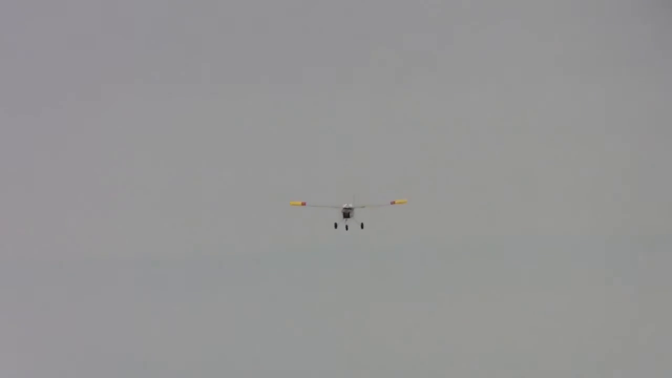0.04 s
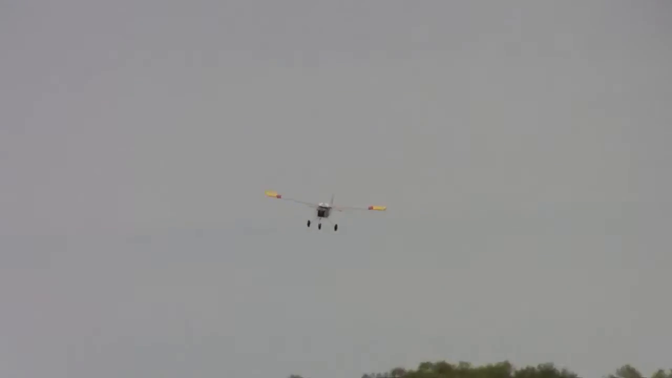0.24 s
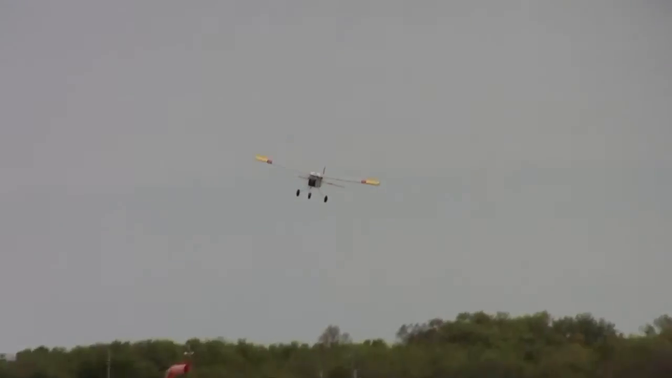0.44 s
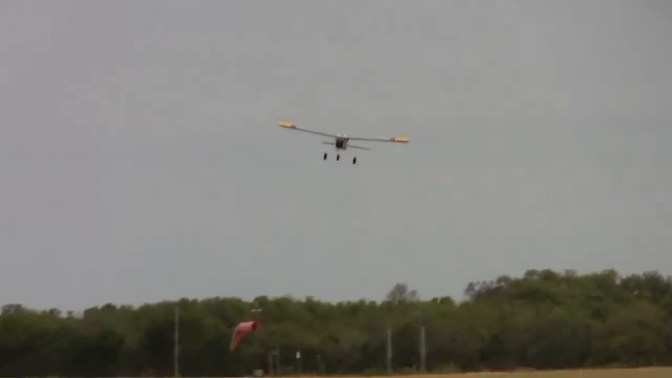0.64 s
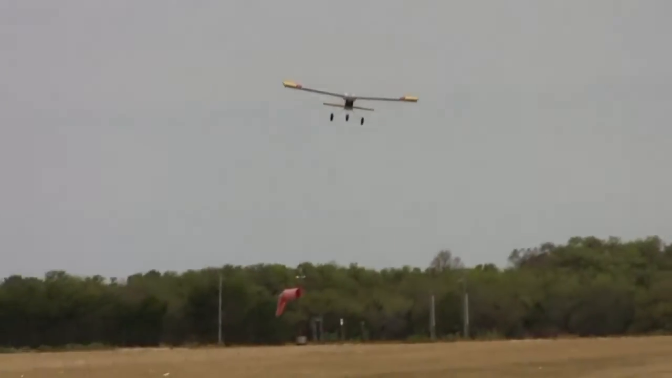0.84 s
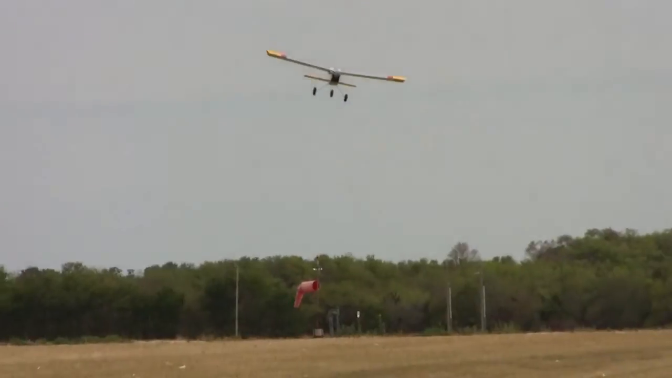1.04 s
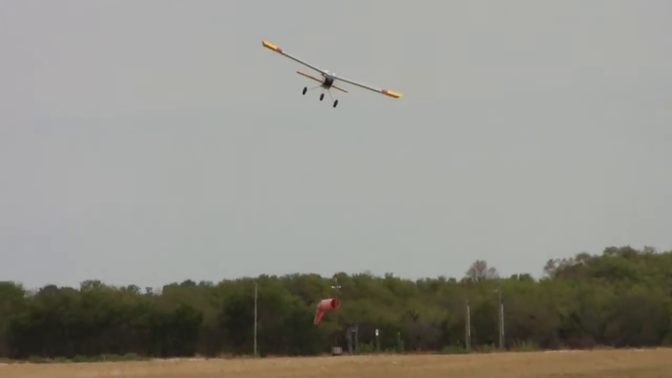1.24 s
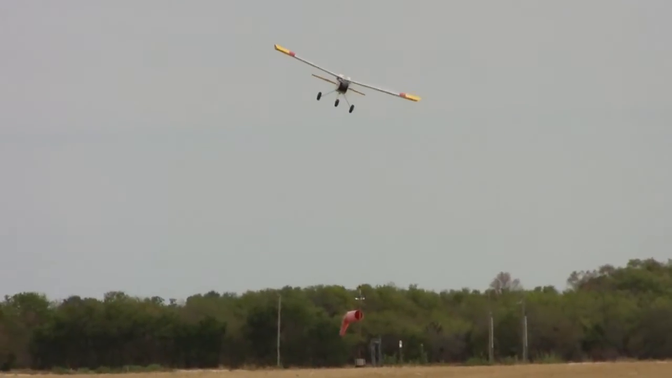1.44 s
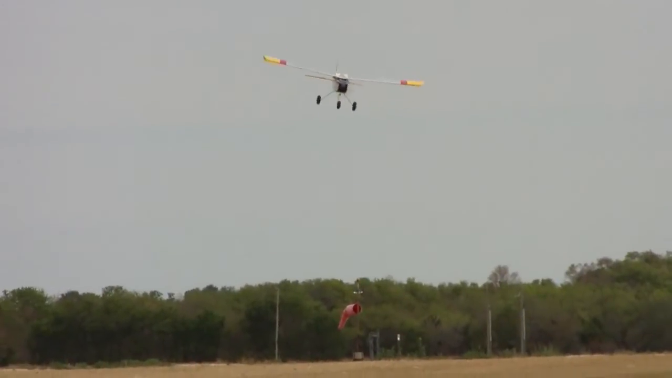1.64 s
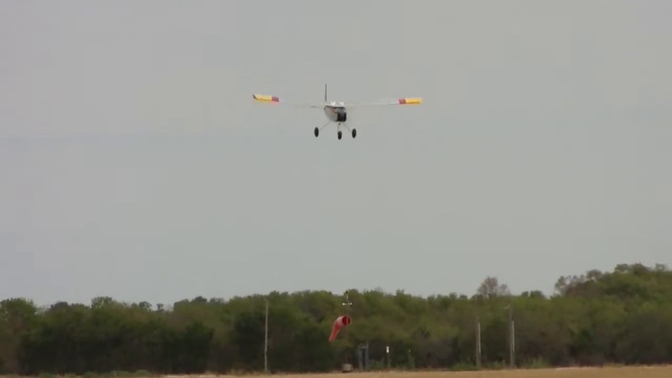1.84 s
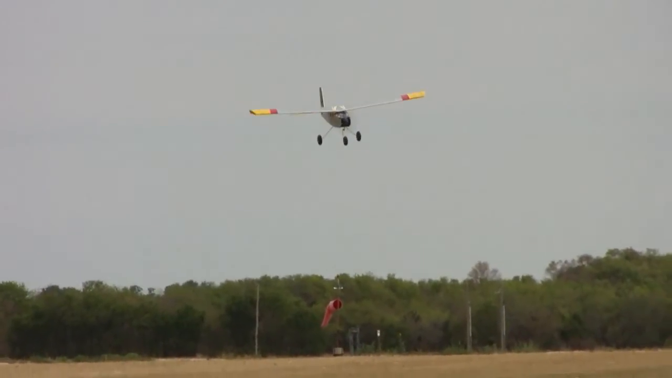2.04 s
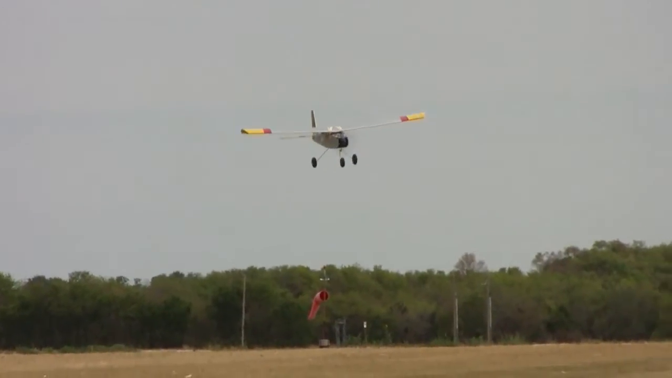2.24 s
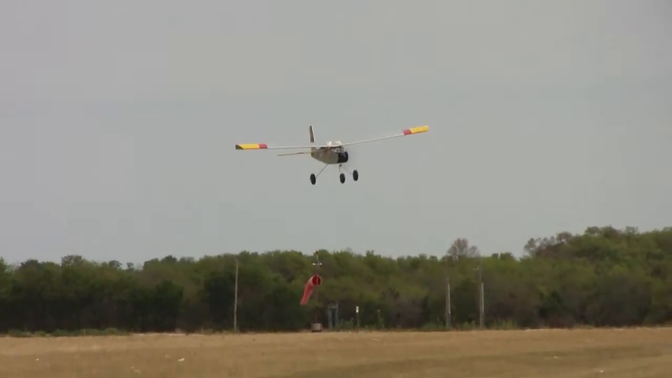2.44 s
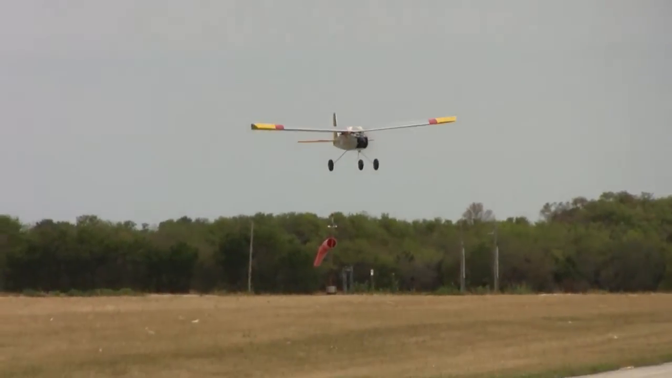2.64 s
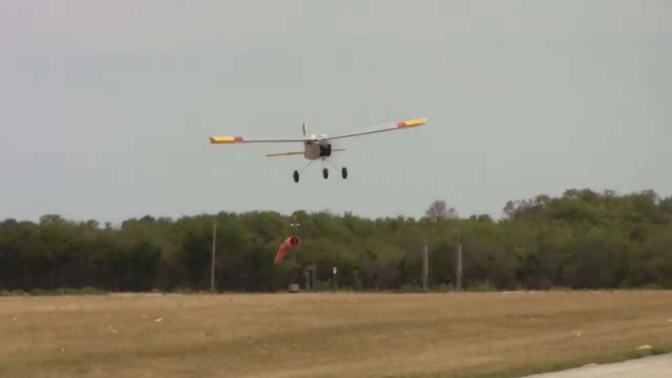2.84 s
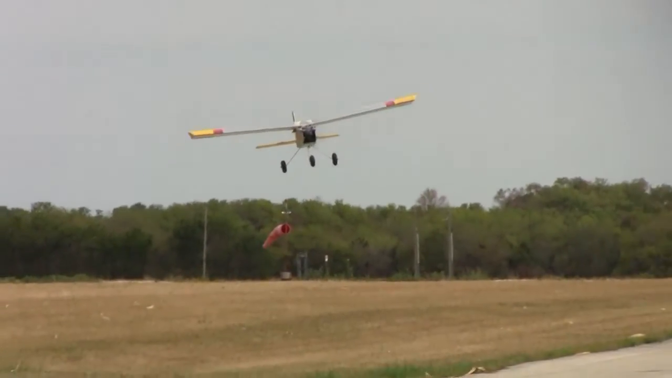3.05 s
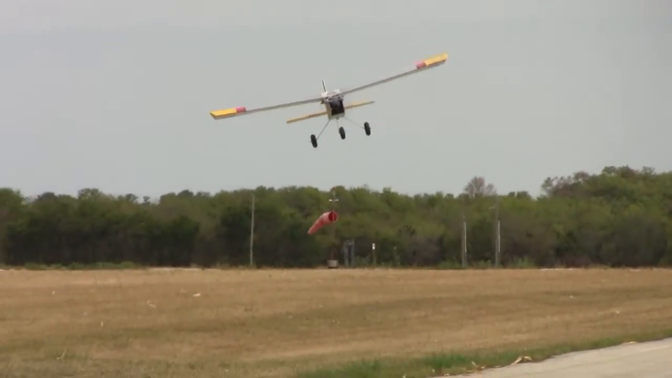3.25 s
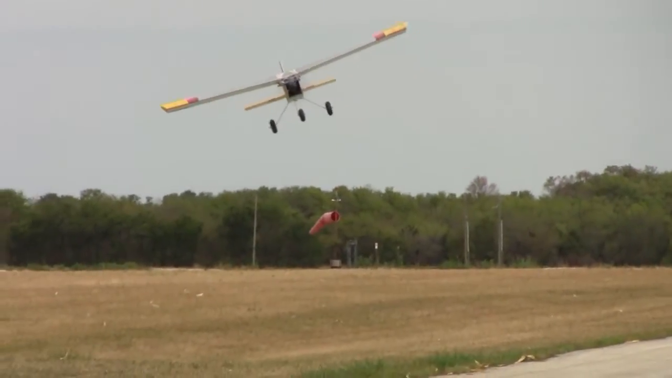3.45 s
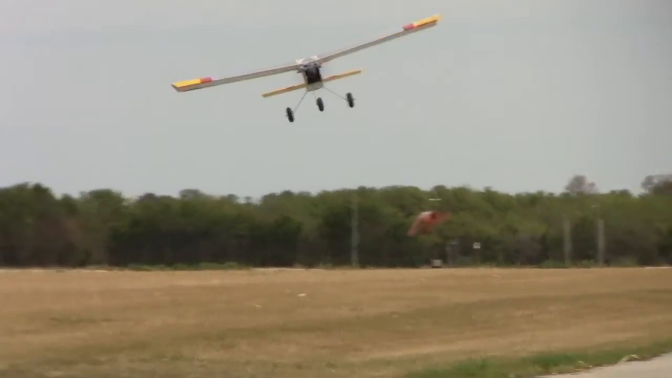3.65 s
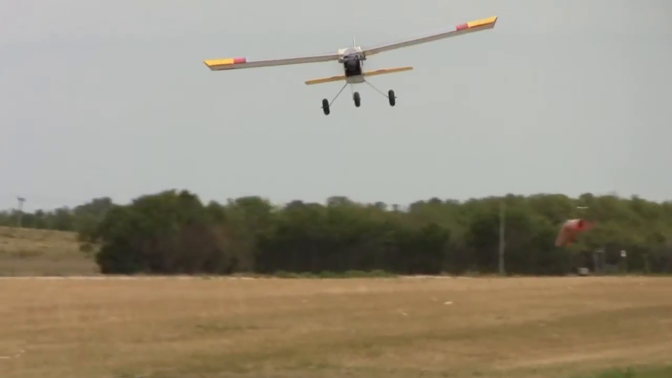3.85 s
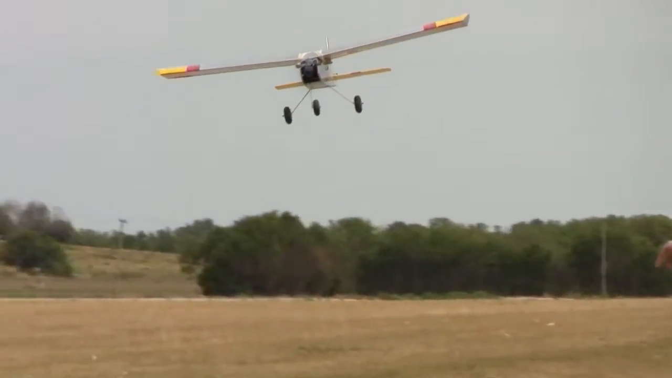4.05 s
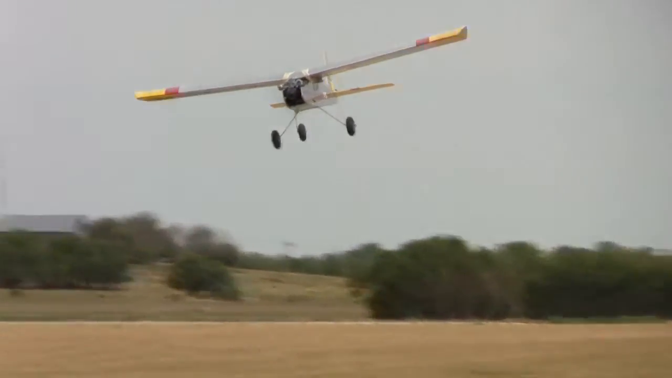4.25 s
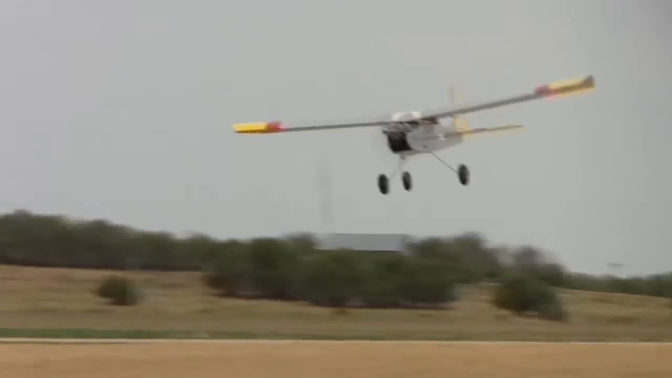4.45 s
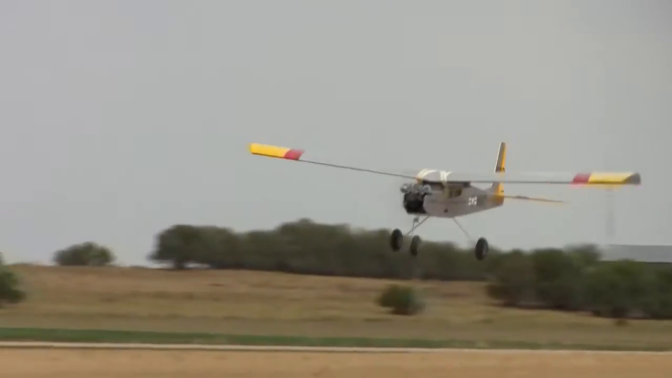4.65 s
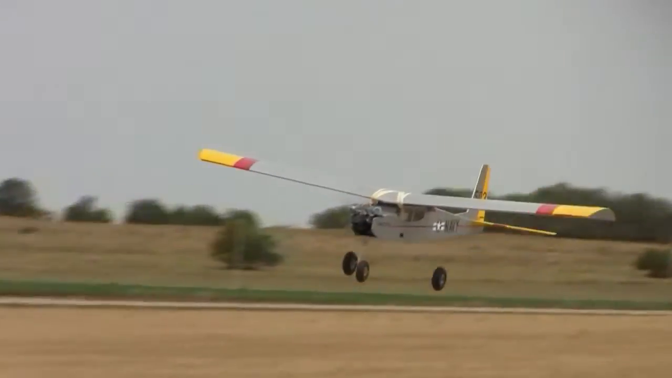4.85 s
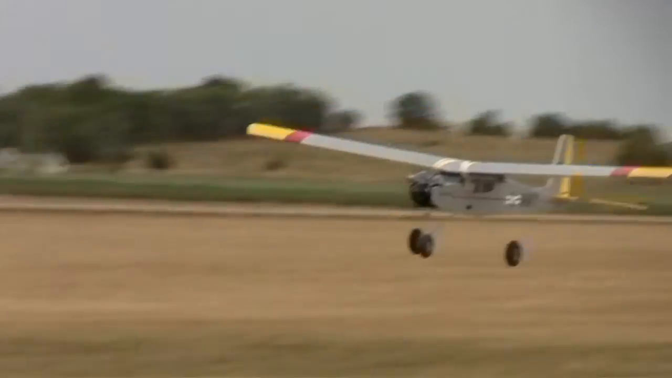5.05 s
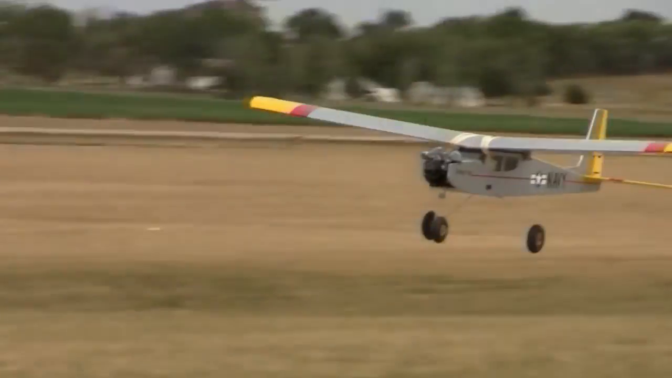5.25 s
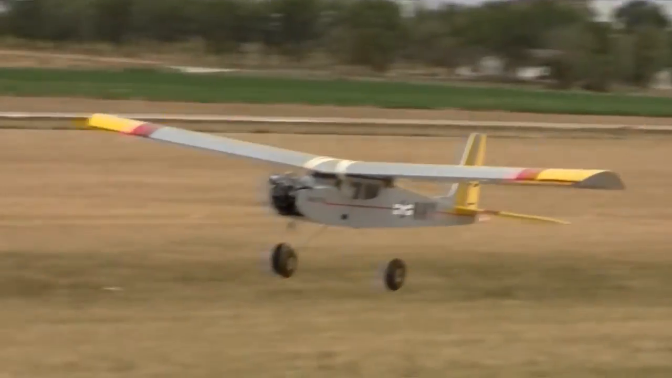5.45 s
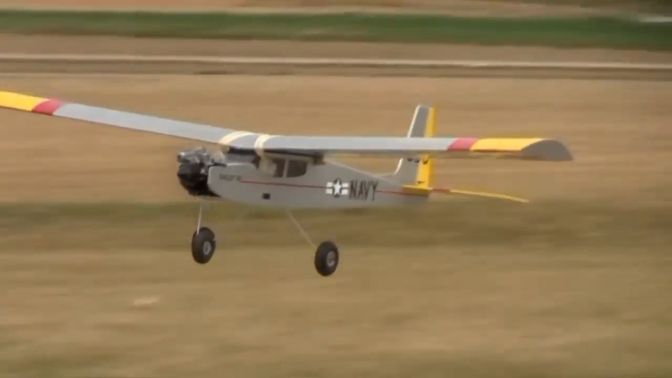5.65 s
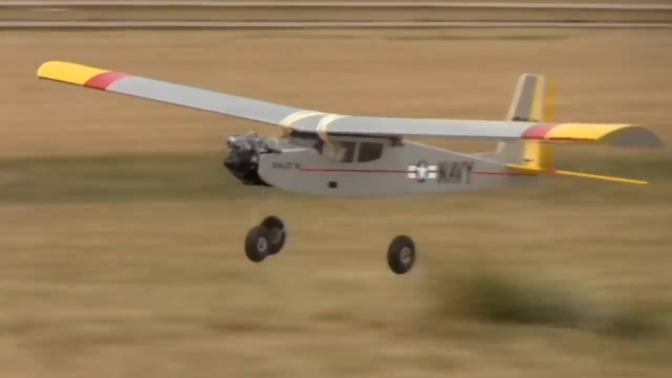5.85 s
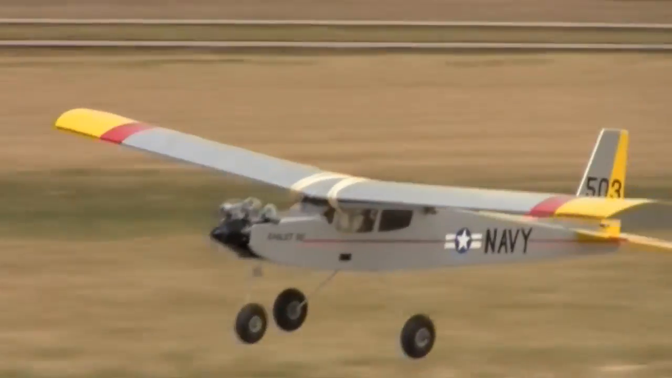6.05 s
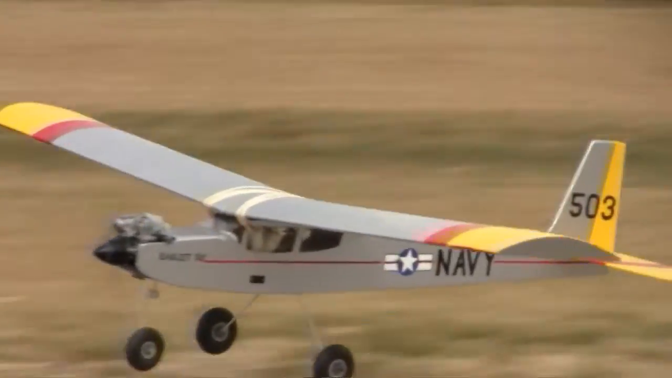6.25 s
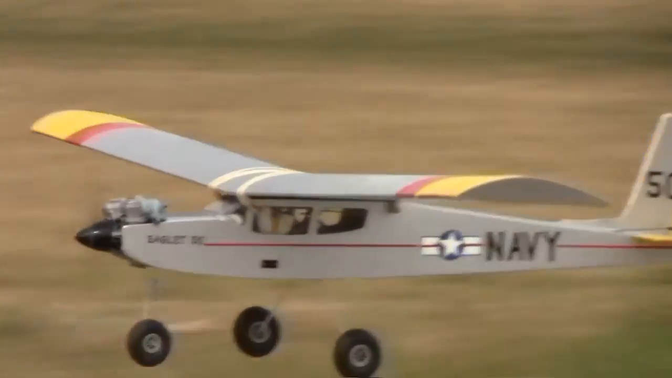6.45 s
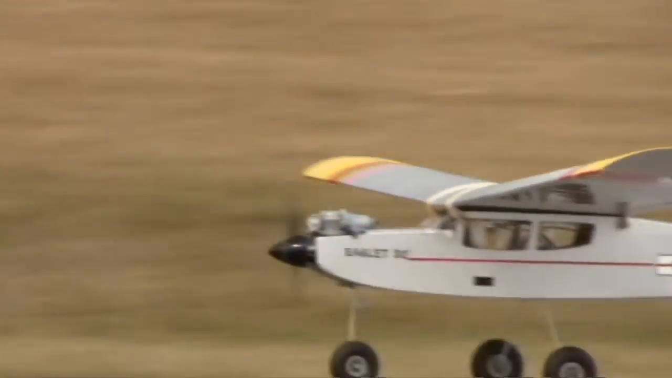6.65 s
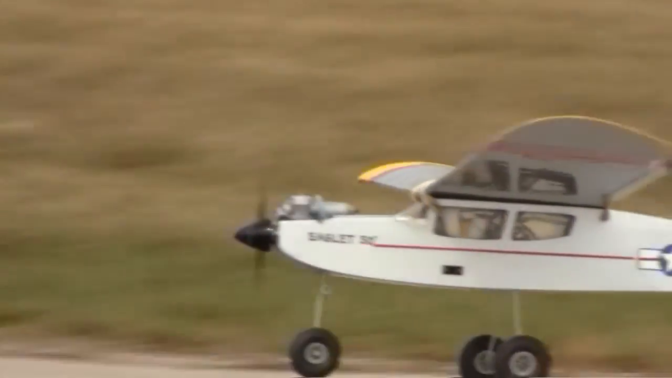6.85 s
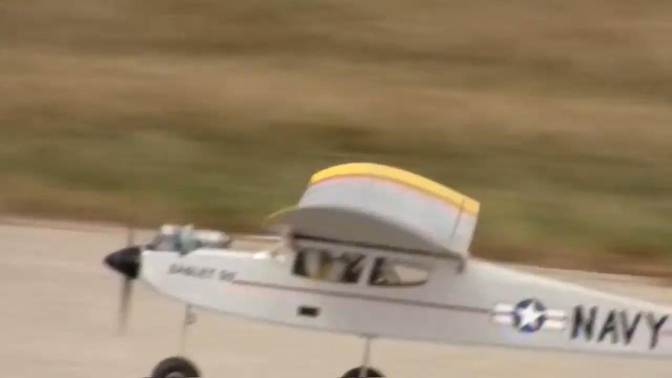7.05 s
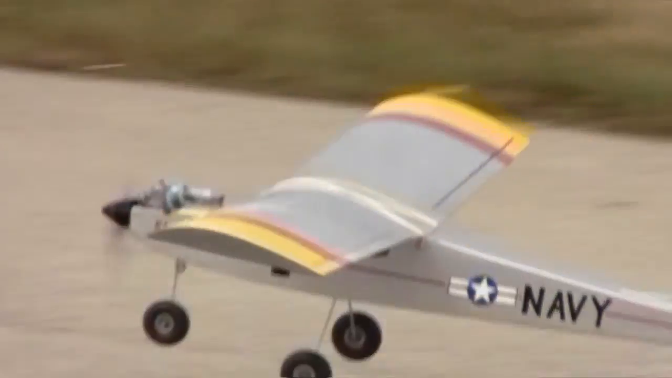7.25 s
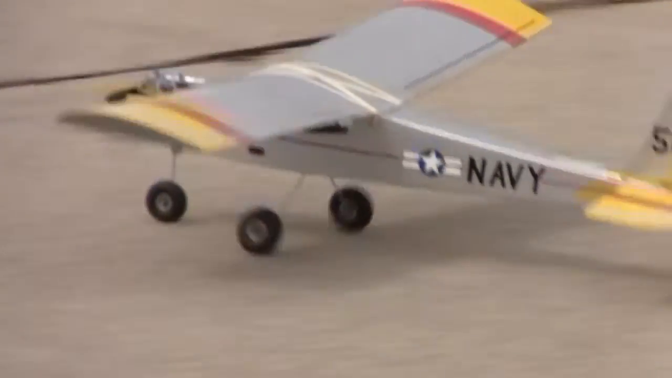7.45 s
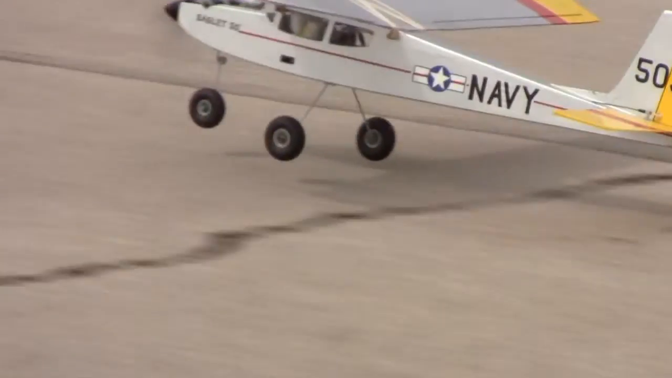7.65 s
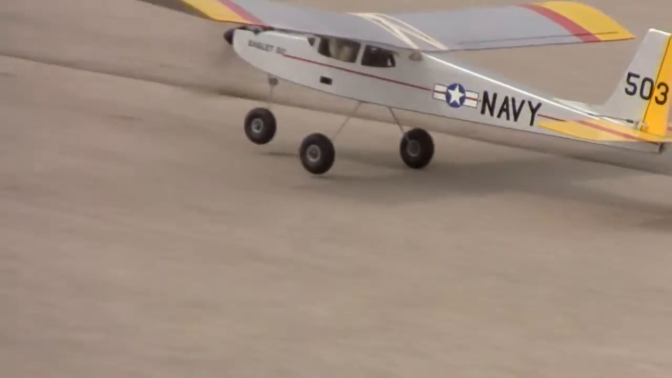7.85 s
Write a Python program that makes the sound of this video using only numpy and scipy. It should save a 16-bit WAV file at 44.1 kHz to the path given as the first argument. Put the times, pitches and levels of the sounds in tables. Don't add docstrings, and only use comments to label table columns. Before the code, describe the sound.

A small single-cylinder model airplane engine buzzes closer, its wheels clatter onto concrete, and low gusts of wind batter the microphone at the end.

```python
import sys
import numpy as np
from scipy import signal
from scipy.fft import rfft, irfft, next_fast_len
from scipy.io import wavfile
from scipy.ndimage import uniform_filter1d, map_coordinates

SR = 44100
rng = np.random.default_rng(int(sys.argv[2]) if len(sys.argv) > 2 else 0)


def voltage_ratio(level):
    return 10 ** (np.asarray(level, float) / 20)


def dump(signal):
    limited = np.clip(np.atleast_2d(signal).T, -1, 1)
    pcm = np.round(limited * 32767).astype(np.int16)
    wavfile.write(sys.argv[1], SR, pcm)


N = 348831


def rms_one(x):
    return x / np.sqrt(np.mean(x ** 2) + 1e-20)


def in_time(rows):
    s, *columns = np.transpose(rows)
    return [np.interp(np.arange(N) / SR, s, c) for c in columns]


def curve(rows):
    return in_time(rows)[0]


def tent(s, half_s):
    return np.clip(1 - np.abs(np.arange(N) / SR - s) / half_s, 0, 1)


def tents(rows):
    return sum(db * tent(s, half_s) for s, half_s, db in rows)


def at_hz(points, hz):
    return np.interp(np.log(hz + 1), np.log(np.array(points)[:, 0]), np.array(points)[:, 1])


def drift(rate):
    r = np.exp(-2 * np.pi * rate / SR)
    return rms_one(signal.lfilter([1], [1, -2 * r, r * r], rng.standard_normal(N + SR))[SR:])


def resonance(x, hz, width_hz):
    r = np.exp(-np.pi * width_hz / SR)
    poles = [1, -2 * r * np.cos(2 * np.pi * hz / SR), r * r]
    return signal.lfilter([(1 - r * r) / 2, 0, (r * r - 1) / 2], poles, x + 1e-18)


def bandpass(x, order, band_hz):
    return signal.sosfilt(signal.butter(order, band_hz, "band", fs=SR, output="sos"), x)


def stereo_noise(spectrum, likeness):
    size = next_fast_len(N)
    hz = np.arange(size // 2 + 1) * SR / size
    outside = np.maximum(spectrum[0][0] / (hz + 1), hz / spectrum[-1][0]).clip(1)
    mid, side = rfft(rng.standard_normal((2, size))) * voltage_ratio(at_hz(spectrum, hz)) / outside ** 4
    alike = np.clip(at_hz(likeness, hz), -1, 1)
    both = np.sqrt(1 + alike) * mid + np.sqrt(1 - alike) * side * [[1], [-1]]
    return rms_one(irfft(both, size)[:, :N])


# frequency in Hz, density in dB per Hz.
FIELD_COLOUR = [(24, -55), (40, -33), (100, -23), (260, -6), (301, -7), (359, -3.5), (417, -1), (591, -5),
                (797, -4.5), (1250, -10.5), (2110, -14.5), (15500, -45)]
# frequency in Hz, left-right likeness from -1 to 1.
FIELD_LIKENESS = [(60, 1), (240, 0.071), (950, 0.01), (3770, 0.17), (15000, 0.21)]


def field():
    return voltage_ratio(-54 + 1.2 * drift(12)) * stereo_noise(FIELD_COLOUR, FIELD_LIKENESS)


def blows(rows):
    t = np.arange(0, N, 16) / SR
    lull_db, roundness = -86, 1.6
    power = voltage_ratio(2 * lull_db)
    for s, db, lose_s in rows:
        power = power + voltage_ratio(2 * (db - 20 * (np.abs(t - s) / lose_s) ** roundness))
    return np.interp(np.arange(N) / SR, t, np.sqrt(power))


def evened(x):
    even_s, share = .016, .7
    return rms_one(x / (uniform_filter1d(x ** 2, round(even_s * SR)) + .02) ** (share / 2))


# peak time in seconds, level in dB.
SNAPS = [(7.55, -36), (7.565, -30), (7.608, -30), (7.629, -30), (7.652, -33), (7.68, -36), (7.69, -36),
         (7.70, -29), (7.738, -34), (7.835, -35), (7.871, -31), (7.897, -35)]


def snaps():
    apart, shared = bandpass(rng.standard_normal((2, N)), 2, (600, 2100))
    levels = blows([(s, db - 4, .010) for s, db in SNAPS])
    return levels * rms_one(apart * [[1.3], [-.7]] + .4 * shared)


# centre in seconds, peak in dB, frequency in Hz, left minus right in dB.
SLAPS = [(6.728, -27, 156, -1), (6.790, -23, 275, 7), (6.829, -15, 183, 2), (6.955, -17, 242, 3),
         (6.992, -20, 269, 1), (7.028, -20, 199, 0), (7.049, -16, 248, 2), (7.151, -24, 135, -6),
         (7.226, -24, 194, -3), (7.294, -16, 205, -1), (7.364, -20, 161, -1), (7.480, -16, 258, 3),
         (7.504, -21, 226, 0), (7.568, -16, 210, 3), (7.588, -15, 275, 2), (7.620, -9, 312, 7),
         (7.635, -9, 260, 0), (7.689, -14, 221, 5), (7.705, -8, 307, 3), (7.740, -11, 167, 0),
         (7.764, -13, 194, 1), (7.799, -17, 323, 2), (7.869, -11, 221, -2), (7.898, -11, 323, -5)]


def slaps():
    half_cycles, side_db = .75, -1.5
    out = np.zeros((2, N + SR))
    age = np.arange(-SR // 50, SR // 50) / SR
    for s, db, hz, lean_db in SLAPS:
        angle = 2 * np.pi * (hz * age + rng.random((2, 1)))
        both, apart = np.exp(-(age * hz / half_cycles) ** 2) * np.sin(angle)
        push = both + voltage_ratio(side_db) * apart * [[1], [-1]]
        start = round(s * SR) - SR // 50
        out[:, start:start + len(age)] += voltage_ratio(db - 1.5 + lean_db * np.array([[.3], [-.3]])) * push
    return out[:, :N]


# frequency in Hz, density in dB per Hz.
THUMP = [(15, -61), (25, -39), (38, -25), (102, -1.5), (188, -0.5), (246, -7), (276, -6), (336, -1.5),
         (373, -15.5), (400, -27), (520, -24), (880, -120)]
# frequency in Hz, density in dB per Hz.
FLUTTER = [(71, -34), (120, -11), (187, 2), (312, -0.5), (362, -2.5), (480, -8.5), (1510, -25.5),
           (3000, -46.5), (3900, -91), (6600, -120)]
# peak time in seconds, thump in dB, seconds to lose 20 dB.
GUSTS = [(.17, -55, .2), (.36, -67, .1), (1.16, -71.5, 0.5), (1.375, -51, 0.04), (1.55, -59.5, 0.06),
         (1.96, -60.5, .09), (2.21, -55, .13), (2.41, -66.5, .1), (3.201, -66, 0.1), (3.36, -64, .1),
         (3.48, -50.5, 0.07), (4.2, -64.5, 0.3), (4.57, -53, 0.23), (4.91, -50, 0.14), (5.039, -48, 0.1),
         (5.19, -44, .11), (5.32, -54, .12), (5.5, -47, 0.1), (5.75, -53.5, 0.17), (5.909, -53.5, 0.1),
         (6.15, -60, .12), (6.4, -68, .3), (6.56, -49.5, 0.2)]
# peak time in seconds, thump in dB, flutter in dB, seconds to lose 20 dB.
SQUALL = [(6.72, -38.5, -47, 0.05), (6.82, -33, -33, 0.11), (6.972, -31, -26.5, 0.18),
          (7.11, -30, -32, 0.14), (7.21, -33, -34, .12), (7.27, -30, -31, .08), (7.41, -34, -33, .08),
          (7.34, -29, -28.5, 0.17), (7.48, -33.5, -27.5, 0.1), (7.57, -31, -22, 0.1),
          (7.625, -30, -14.5, 0.0671), (7.709, -26, -15, 0.086), (7.8, -28.5, -22, 0.15),
          (7.89, -29, -16, 0.13)]
# peak time in seconds, level in dB, seconds to lose 20 dB, left minus right in dB.
EDDIES = [(6.729, -28, 0.023, 0), (6.742, -32, 0.015, 9), (6.791, -23, 0.019, 8), (6.807, -28, 0.017, 2),
          (6.83, -18, 0.034, 1), (6.861, -26, 0.017, 6), (6.875, -27, 0.015, 1), (6.89, -32, 0.015, -1),
          (6.92, -22, 0.015, 1), (6.955, -17, 0.06, 4), (6.991, -22, 0.015, 2), (7.029, -20, 0.031, -1),
          (7.051, -15, 0.06, 2), (7.095, -21, 0.048, -2), (7.132, -22, 0.02, -1), (7.151, -28, 0.015, -6),
          (7.168, -26, 0.021, -2), (7.194, -25, 0.017, -3), (7.228, -23, 0.025, -4), (7.279, -21, 0.042, 4),
          (7.332, -15, 0.06, 0), (7.38, -23, 0.016, 2), (7.396, -20, 0.022, -6), (7.416, -24, 0.015, 1),
          (7.48, -17, 0.035, 2), (7.502, -23, 0.018, 2), (7.529, -22, 0.034, 0), (7.565, -16, 0.028, 1),
          (7.588, -17, 0.015, 3), (7.634, -10, 0.06, 0), (7.665, -16, 0.015, -3), (7.701, -14, 0.06, 0),
          (7.739, -13, 0.016, 2), (7.763, -12, 0.018, 2), (7.8, -16, 0.032, 1), (7.862, -13, 0.039, 0),
          (7.9, -12, 0.06, -4)]


def wind():
    strong, eddies = np.array(SQUALL), np.array(EDDIES)
    thump_level = blows(GUSTS + list(strong[:, [0, 1, 3]]))
    light_flutters = [(s, db - 15, lose_s) for s, db, lose_s in GUSTS]
    flutter_level = blows(light_flutters + list(strong[:, [0, 2, 3]]))
    lumps = blows(eddies[:, :3])
    lumps = .5 + .5 * lumps / uniform_filter1d(lumps, round(.12 * SR))
    lean_db = curve([(eddies[0, 0] - .05, 0)] + list(eddies[:, [0, 3]]))
    thump = evened(stereo_noise(THUMP, [(30, 1.0), (60, 0.75), (130, 0.7), (300, -0.67)]))
    thump = thump * voltage_ratio(1.0 * drift(30))
    flutter = evened(stereo_noise(FLUTTER, [(150, 0.1), (300, -0.41), (700, -0.28), (2000, 0.35)]))
    flutter = flutter * voltage_ratio(1.0 * drift(31))
    air = voltage_ratio([[1.0], [3.0]]) * thump_level * thump + voltage_ratio([[2.5], [0.5]]) * flutter_level * flutter
    return air * lumps * voltage_ratio(lean_db * [[.35], [-.35]]) + snaps() + slaps()


# frequency in Hz, level in dB, t60 in seconds, sign.
GEAR_MODES = [(1480, -.5, .009, 1), (1850, 2.5, .010, -1), (2950, -4, .011, -1), (3450, -3.5, .008, 1)]
# start in seconds, peak in dB, broad crack around 4.5 kHz in dB, upper modes in dB, ring length
KNOCKS = [(6.618, -40, -43.5, 0, 0.8), (6.846, -26, -50, -8, .8), (6.8525, -29.5, -46, 2, 0.8),
          (6.8775, -29, -37, 2, 0.68), (6.8965, -27, -35, 3, 0.6), (6.9025, -18, -33, -3, 0.8),
          (6.9225, -17.5, -33, -5, 0.8), (6.936, -26, -50, 4, .6), (6.9409, -12.5, -39, -7, 0.55),
          (6.955, -12.5, -40, -1, 0.7), (6.964, -24, -37, 2, 0.9), (6.9688, -8, -41, 0, 0.7),
          (6.975, -27, -50, 3, 1), (6.9888, -16, -38, -2, 1), (6.993, -23, -45, 0, 1),
          (6.9965, -16.5, -43, 1, 1), (7.003, -27, -52, 0, .7), (7.05, -38, -52, 3, .6),
          (7.0804, -32, -50, 0, 0.8), (7.27, -36, -55, 6, .8), (7.512, -35, -50, 3, .5),
          (7.5615, -24, -48, -4, 0.43), (7.5815, -16, -28, 2, 0.45), (7.6063, -7, -24.5, 0, 0.3),
          (7.628, -20, -48, -3, .6), (7.647, -12, -22.5, 1, 0.4), (7.699, -24, -54, -10, .6),
          (7.752, -30, -48, -5, .5), (7.871, -26, -50, -8, .6)]


def gear_knocks():
    out = np.zeros((2, N))
    age = np.arange(round(.04 * SR)) / SR
    for s, peak_db, crack_db, upper_db, lasting in KNOCKS:
        ring = 0
        for hz, db, t60, sign in GEAR_MODES:
            mode_db = db - 60 * age / (t60 * lasting) + upper_db * (hz > 2400) + rng.normal(0, 1.2)
            ring = ring + voltage_ratio(mode_db) * sign * np.sin(2 * np.pi * hz * age)
        ring = ring * (1 - np.exp(-age / .0002))
        crack = rng.standard_normal(len(age)) * voltage_ratio(-60 * age / 0.0078)
        crack = resonance(resonance(crack, 4500, 5000), 4800, 6800)
        hit = voltage_ratio(peak_db - 3.2) * ring + voltage_ratio(crack_db + 9) * crack
        start = round(s * SR)
        out[:, start:start + len(age)] += hit[:N - start]
    return out


# start in seconds, length in seconds, level in dB, low edge in Hz, high edge in Hz.
SCUFFS = [
    (2.951, 0.038, -64, 3000, 9900),
    (3.74, 0.077, -56.5, 3500, 12100),
    (6.877, 0.14, -42, 1290, 3840),
    (7.558, 0.093, -38.5, 700, 2400),
]


def scuffs():
    out = np.zeros((2, N))
    size = round(.2 * SR)
    for s, length_s, db, low_hz, high_hz in SCUFFS:
        grit = rng.standard_normal(size) * voltage_ratio(4.0 * rng.standard_normal(size))
        grit = rms_one(bandpass(grit, 3, [low_hz, high_hz]))
        swell = np.sin(np.pi * np.clip(np.arange(size) / SR / length_s, 0, 1)) ** 0.49
        start = round(s * SR)
        out[:, start:start + size] += voltage_ratio(db) * swell * grit
    return out


# frequency in Hz, level in dB.
HUM_BODY = [(150, -75), (170, -66.5), (265, -68.5), (340, -60.5), (400, -60), (455, -50.5), (510, -61),
            (570, -78), (860, -76)]
ORDERS_HEARD = (2, 3, 4, 5, 6, 7, 8, 9, 10, 11, 13, 14)
# peak time in seconds, half length in seconds, order, gain in dB.
HUM_SWELLS = [(.2, .5, 4, 8), (1.2, .45, 4, 7), (.2, .4, 5, -5), (.2, .8, 7, 18), (.15, .9, 8, 19),
              (1.0, .9, 8, 19), (.75, .3, 10, 17), (.8, .3, 6, 9), (7.33, .3, 10, 33), (7.38, .2, 11, 29),
              (7.75, .35, 11, 30), (7.7, .45, 14, 32), (6.45, .7, 14, 15), (7.3, .3, 13, 20),
              (7.35, .35, 7, 24), (7.75, .3, 7, 26), (2.6, .8, 9, 12), (1.55, .2, 5, 5),
              (7.05, .25, 11, 16), (3.1, .5, 8, 8), (2.3, .6, 5, 2), (6.7, .3, 3, 6), (3.8, .25, 4, -10),
              (4.8, .2, 6, 8), (6.2, .5, 6, 6), (6.3, .9, 13, 17.5), (6.3, .3, 10, 12),
              (0.81, 0.45, 3, 10.5), (0.88, 0.33, 5, 11), (1.35, 0.15, 5, -6), (3.857, 0.23, 6, -12),
              (4.497, 0.32, 6, -22), (3.4, 0.43, 4, -2.5), (5.5, 0.72, 5, -7.5), (6.004, 0.74, 3, 8),
              (6.2, 1.1, 4, 5.5), (6.502, 0.52, 2, 7.5), (6.7, .3, 6, 13), (7.25, 0.33, 6, 6),
              (6.15, .35, 2, 3.5), (3.77, 0.45, 2, -4), (2.2, 1.2, 7, 9), (2.855, .25, 8, 10),
              (6.9, .9, 8, 6.5)]


def hum(per_s, turns, pop_db, lag_ms):
    out, echo = 0, 0.66
    near_db = 0.77 * (np.maximum(pop_db, -56.5) + 51)
    for order in ORDERS_HEARD:
        hz = order * per_s
        db = at_hz(HUM_BODY, hz) + near_db + 1.4 * drift(5.1)
        db = db + tents([(s, half_s, gain_db) for s, half_s, k, gain_db in HUM_SWELLS if round(k) == order])
        comb = np.cos(2 * np.pi * hz * lag_ms / 1000)
        ground = np.sqrt(1 + echo ** 2 + 2 * echo * comb) / (1 + echo)
        out = out + voltage_ratio(db) * ground * np.sqrt(2) * np.sin(2 * np.pi * order * turns + order ** 2)
    return out


# time in seconds, cycles a turn, swing as a share, loudest angle of the turn in radians.
WHISTLE = [(2.0, 137, .012, 1), (2.9, 139, .012, 1), (3.6, 136, .015, 1), (4.65, 139, .02, 1),
           (5.0, 136, .035, 2.2), (5.35, 128, .11, 1.6), (5.8, 133, .07, .4), (6.05, 131, .07, .8),
           (6.33, 133, .085, 1.2), (6.8, 127, .085, .4), (7.1, 136, .09, 2.4), (7.3, 136, .08, 2.4),
           (7.5, 136, .05, 2.2), (7.65, 141, .045, 3.8)]


def whistle(per_s, turns):
    cycles, swing, loudest = in_time(WHISTLE)
    angle = 2 * np.pi * turns
    broken = curve([(0, .012), (5.2, .014), (5.8, .022), (6.6, .022), (6.9, .04), (7.45, .035), (7.65, .016)])
    sweep = swing * voltage_ratio(.9 * drift(30)) * np.cos(angle)
    hz = cycles * per_s * (1 - sweep + broken * drift(400))
    loud_db = 4.0 * np.cos(angle - loudest) + 3.5 * drift(300) + 1.4 * drift(12)
    phase = 2 * np.pi * np.cumsum(hz) / SR + [[.35], [-.35]]
    return rms_one(voltage_ratio(loud_db + [[-1.0], [1.0]]) * np.sin(phase))


# time in seconds, frequency in Hz.
RING_HZ = [(0, 6220), (4.5, 6164), (7.91, 5890)]


def silencer_ring(clicks):
    strikes = rms_one(clicks) * 1.05 + rng.standard_normal(N)
    drive = resonance(resonance(strikes, 6060, 160), 5910, 280)
    shift = np.exp(2j * np.pi * np.cumsum(curve(RING_HZ) - 6000) / SR)
    moved = np.real(signal.hilbert(drive, next_fast_len(N))[:N] * shift)
    return rms_one(moved * voltage_ratio(2.3 * drift(16)))


# frequency in Hz, density in dB per Hz.
HISS = [(2500, 5), (4000, -5.5), (6000, -0.5), (9000, 1), (11000, 3.5), (12300, -1.5), (13300, -10),
        (19500, -19)]


def exhaust_jet(turns):
    hiss = stereo_noise(HISS, [(3000, 1.0), (7000, 0.97), (15000, 0.74)])
    here = .65 * turns * SR / 90 + .35 * np.arange(N)
    hiss = np.array([map_coordinates(c, [here], order=5) for c in hiss])
    return hiss * voltage_ratio(1.3 * drift(22) + 0.11 * np.cos(2 * np.pi * turns - .6))


# frequency in Hz, density in dB per Hz.
RATTLE = [(300, -3), (680, 6), (1100, 4.5), (1540, 7), (1760, 1), (2350, -5.5), (2850, -5.5), (3900, -12.5)]


def rattle():
    return stereo_noise(RATTLE, [(500, 0.66), (1400, 0.97), (3000, 0.95)])


def airframe(clicks, t60):
    fade = voltage_ratio(-60 * np.arange(SR // 10) / SR / t60)
    burst = stereo_noise(RATTLE, [(500, 1.0), (3000, 0.9)])[:, :SR // 10] * fade
    return rms_one(signal.fftconvolve(clicks[None], burst)[:, :N])


SKIPS = [.071, .332, 1.481, 1.722, 1.81, 1.976, 2.742, 3.341, 3.375, 3.739, 3.922, 3.975, 4.013, 4.055,
         4.223, 4.376, 4.52, 4.54, 5.202, 5.343, 5.46, 5.717, 5.799, 5.884, 6.209, 6.356, 6.69, 7.343,
         7.522]


def firings(turns, jitter, uneven_db):
    chance = rng.standard_normal((int(turns[-1]) + 1, 2))
    at = np.interp(np.arange(len(chance)) + jitter * chance[:, 0], turns, np.arange(N)).astype(int)
    db = uneven_db * chance[:, 1]
    skipped = np.abs(at[:, None] / SR - SKIPS).argmin(axis=0)
    db[skipped] += -11
    clicks = np.zeros(N)
    clicks[at] = voltage_ratio(db)
    return clicks


# frequency in Hz, width in Hz, level in dB.
SILENCER = [(790, 190, 2), (1130, 460, 1.5), (1560, 520, 1), (1960, 420, -2), (3200, 900, 3)]
# time in seconds, level in dB.
OUTLET_SEEN = [(0, -13), (3.3, -14), (3.7, -9), (4.6, -11), (5.0, -16), (7.91, -18)]


def silencer_pops(clicks):
    out, outlet_db = 0, curve(OUTLET_SEEN)
    for k, (hz, width, db) in enumerate(SILENCER):
        ring = resonance(resonance(clicks, hz, width * 0.95), hz, width * 0.95)
        out = out + voltage_ratio(db + (hz > 2500) * outlet_db) * ring * (-1) ** k
    return rms_one(out)


def off_the_ground(x, lag_ms, strength):
    dull = signal.sosfilt(signal.butter(1, 12000, fs=SR, output="sos"), x)
    here = np.arange(N) - lag_ms * SR / 1000 * (1 + .015 * drift(4))
    echo = np.array([map_coordinates(c, [here], order=3) for c in dull])
    return (x + strength * echo) / np.sqrt(1 + strength ** 2)


# time in seconds, firings per second.
SPEED = [(0.0, 99.3), (0.44, 98.4), (0.77, 109.0), (1.61, 91.1), (2.0, 88.8), (2.42, 91.9), (3.19, 82.3),
         (3.44, 84.2), (4.34, 73.9), (4.67, 74.3), (4.93, 94.8), (5.2, 94.9), (5.84, 82.0), (6.3, 83.8),
         (7.4, 81.0), (7.49, 77.0), (7.67, 78.0), (7.91, 75.3)]
# time in seconds, lag in ms.
LAG = [(0, .41), (1.0, .44), (1.5, .51), (2.0, .545), (2.75, .483), (3.3, .51), (3.8, .62), (4.15, .71),
       (4.65, .785), (5.2, .71), (5.45, .74), (5.65, .82), (6.05, 1.0), (6.5, 1.03), (6.8, .97), (7.1, .66),
       (7.4, .36), (7.6, .18), (7.91, .16)]
# time in seconds, pop level in dB.
NEARNESS = [(0, -58), (.35, -62.5), (1.3, -57), (1.65, -55), (2.02, -52), (2.75, -50.5), (3.2, -52),
            (3.95, -47), (4.7, -45), (5.33, -40.5), (5.6, -42), (6.3, -38), (6.92, -36.5), (7.14, -39.5),
            (7.4, -41.5), (7.6, -41.5), (7.91, -43.5)]
# time in seconds, level in dB.
THROTTLE = [(1.4, -26.5), (2.0, -22), (3.2, -24.5), (3.6, -20), (4.65, -24.5), (4.9, -13), (6.9, -19.5),
            (7.4, -18), (7.75, -10)]
# time in seconds, hiss echo from 0 to 1.
NOSE_ON = [(.7, 0), (1.4, 1), (2.6, 0.94), (3.2, 0.45), (4.7, .45), (5.4, 0.3), (5.75, 0), (7.91, 0.03)]
# time in seconds, share kept.
ECHO_BREAKS = [(5.4, 1.0), (5.55, .7), (5.85, .7), (6.0, 1.0), (7.05, 1.0), (7.25, .6), (7.91, .7)]
# time in seconds, level in dB.
SHAKE = [(0, -3), (1.4, 0), (3.3, .5), (3.9, -.5), (5.5, -.5), (6.0, -.5), (6.9, 0), (7.4, 0)]
# peak time in seconds, half length in seconds, gain in dB.
WHISTLE_GLIMPSES = [
    (1.85, .5, 21),
    (2.92, .25, 23),
    (3.5, .45, 13),
    (4.5, .2, -4),
    (7.0, .6, -7),
]
# peak time in seconds, half length in seconds, gain in dB.
RING_LAPSES = [
    (4.6, 0.49, -5),
    (5.6, 0.27, 8),
    (6.079, 0.29, -16),
    (7.55, .12, -6),
    (7.877, .2, 6),
]


def airplane():
    per_s, lag_ms, pop_db, nose_on = (curve(rows) for rows in (SPEED, LAG, NEARNESS, NOSE_ON))
    echo = curve([(5.6, 0.82), (6.9, .72)]) + 0.12 * nose_on
    echo = echo * curve(ECHO_BREAKS)
    hiss_db = pop_db + curve(THROTTLE)
    rattle_db = -2.3 - 6 * nose_on + curve(SHAKE)
    whistle_db = pop_db + curve([(2.9, -38), (5.8, -5)]) + tents(WHISTLE_GLIMPSES)
    ring_db = pop_db + curve([(1.9, -32), (2.1, -22.5)]) + tents(RING_LAPSES)
    turns = np.cumsum(per_s * (1 + .003 * drift(7))) / SR
    clicks = firings(turns, jitter=.004, uneven_db=.9)
    engine = voltage_ratio(-1.2) * silencer_pops(clicks)
    engine = engine + voltage_ratio(-9.0) * airframe(clicks, t60=0.057) + voltage_ratio(rattle_db) * rattle()
    body = off_the_ground(voltage_ratio(pop_db) * engine, lag_ms - .03, np.clip(echo, 0, 1))
    jet = voltage_ratio(hiss_db + 5.5) * exhaust_jet(turns)
    jet = off_the_ground(jet, lag_ms + .004, np.clip(.75 * nose_on, 0, 1))
    out = (body + jet) * voltage_ratio([[-.4], [.4]])
    out = out + voltage_ratio(whistle_db - 3.5) * whistle(per_s, turns)
    out = out + voltage_ratio(ring_db) * silencer_ring(clicks)
    return out + hum(per_s, turns, pop_db, lag_ms)


def scene():
    return field() + wind() + gear_knocks() + scuffs() + airplane()


def top_cut(x):
    return signal.sosfilt(signal.butter(12, 15740, fs=SR, output="sos"), x)


def record(dry):
    mix = 0.92 * np.tanh(dry / 0.96)
    return top_cut(mix)


dry = scene()
out = record(dry)
dump(out)
```